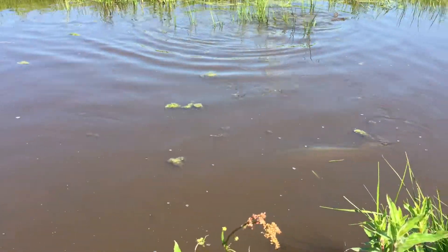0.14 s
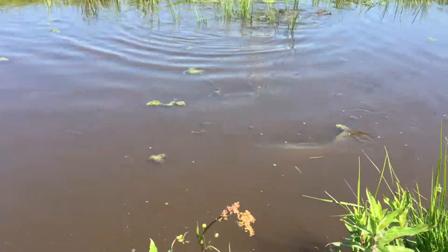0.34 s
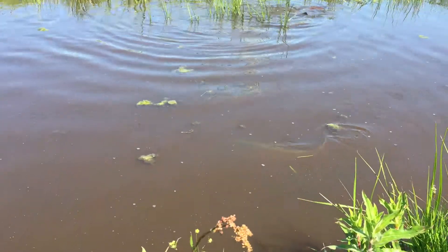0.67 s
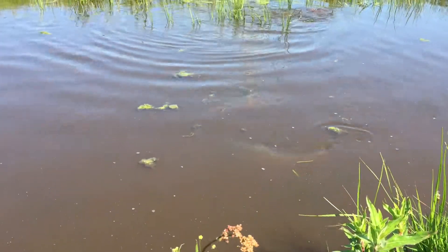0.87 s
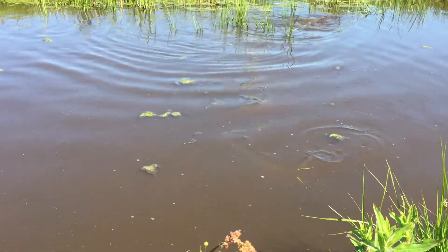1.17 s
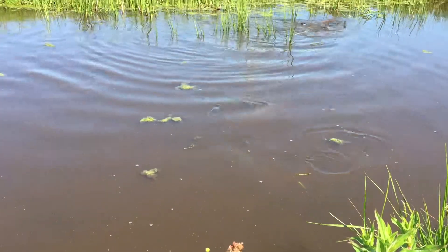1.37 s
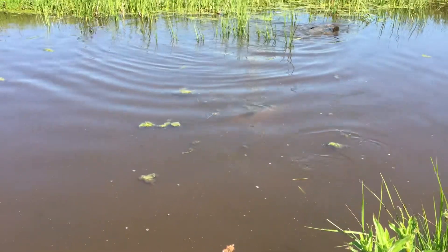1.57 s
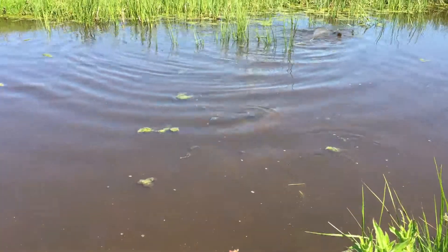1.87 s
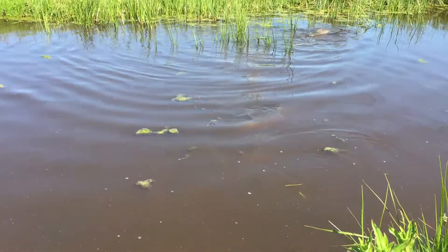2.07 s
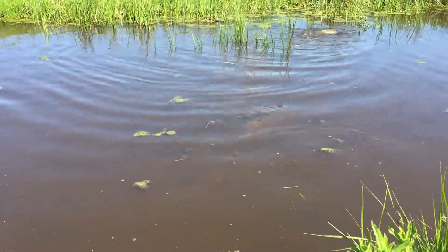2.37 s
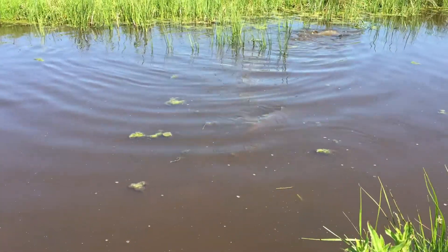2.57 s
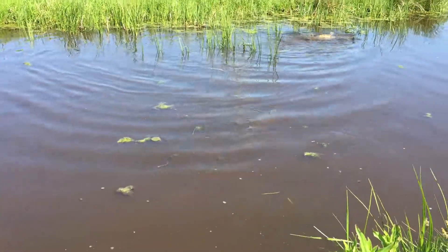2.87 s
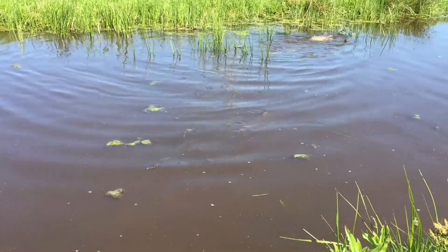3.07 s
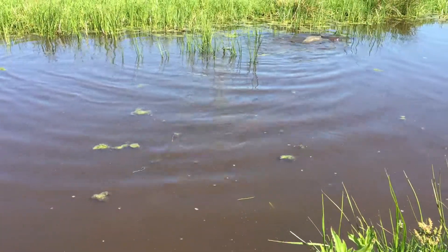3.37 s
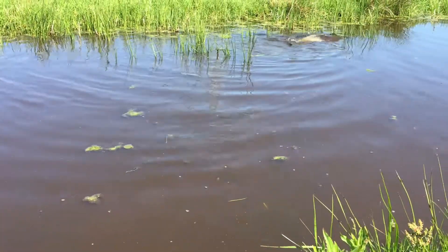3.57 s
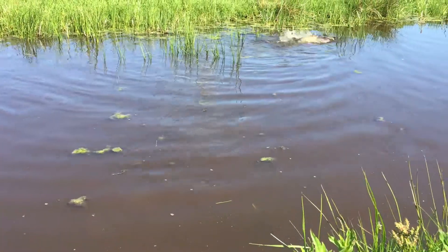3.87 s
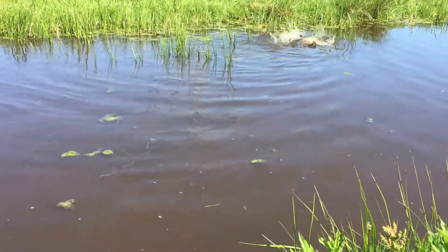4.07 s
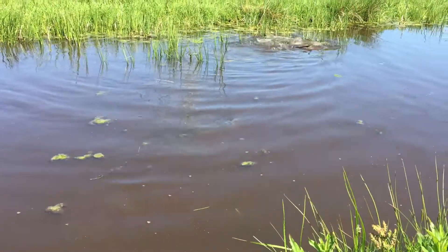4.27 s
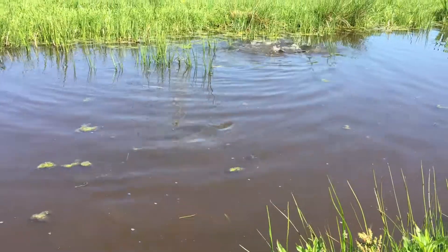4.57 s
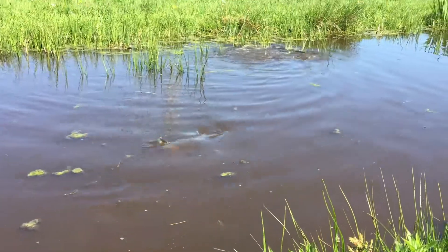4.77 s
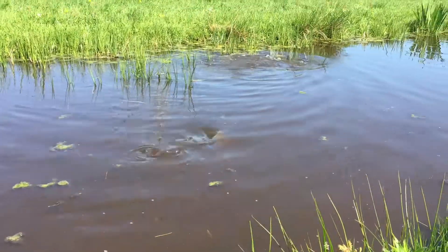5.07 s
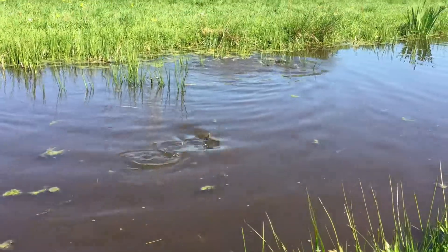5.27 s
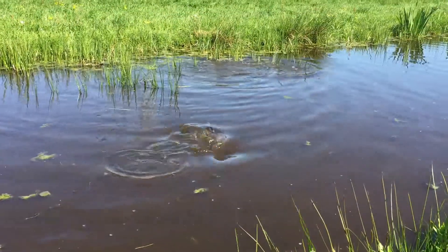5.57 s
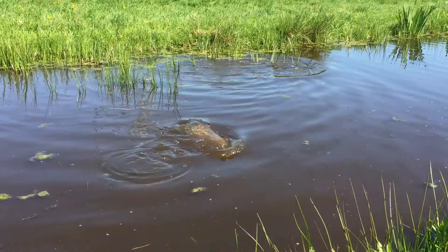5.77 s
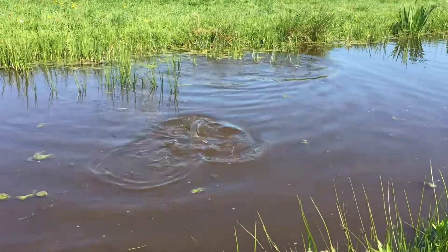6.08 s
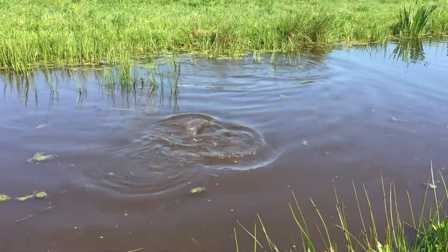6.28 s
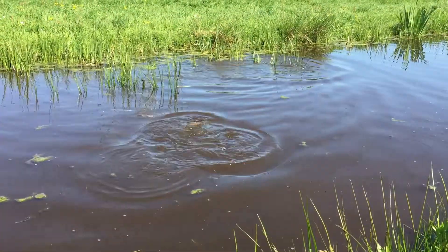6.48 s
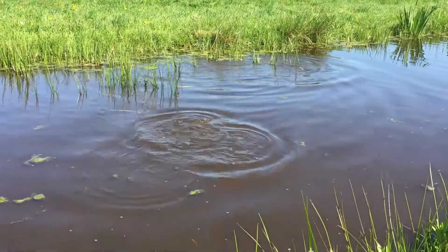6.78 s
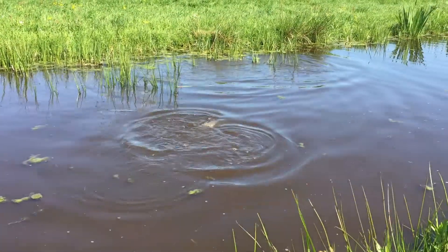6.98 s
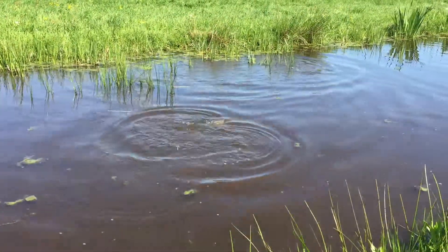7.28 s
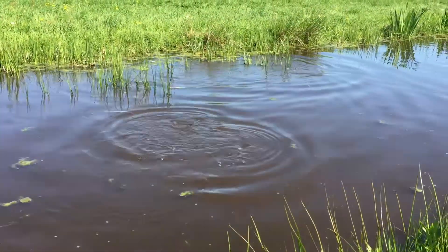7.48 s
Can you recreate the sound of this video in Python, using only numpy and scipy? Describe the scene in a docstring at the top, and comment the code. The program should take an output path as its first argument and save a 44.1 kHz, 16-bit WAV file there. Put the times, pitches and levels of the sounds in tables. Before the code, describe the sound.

A shallow ditch in open grassland, heard in mono from a few metres. Deep, lumpy wind rumble buffets the microphone throughout, over faint airy hiss and a distant low drone, perhaps an aircraft. From 0 to 1 s, fish stir the water with small slaps, rounded plops and tiny ticking drops. It is nearly still until 2.2 s, with only a few soft bubbles around 1.5 s, then light plips and gurgles until 3.5 s. At about 3.6 s the movement builds, and at 3.9-4.2 s comes the loudest splash: sharp wet slaps, hollow bubbles and dense spray, spattering and gurgling away by 5 s. A smaller, uneven roll churns from 5.2 to 5.8 s, strongest near 5.4-5.6 s. Sparse drips tick around 6.1 and 6.4 s. The drone swells slightly after 6.3 s, and very faint gliding whistles, perhaps a bird, appear from 7 s to the end at about 7.6 s.

```python
"""In a shallow grassy ditch, carp roll and thrash at the surface, a few metres from a hand-held microphone.
Trapped air pockets plop as gliding sines; thrown water slaps as bursts of noise and falls back as ticking drops.
Wind rumbles on the microphone as deep noise. A far drone, perhaps an aircraft, is a band of noise with one
slowly sinking tone. A few faint gliding whistles come late, and a steady hiss of open air lies under it all."""
import sys
import numpy as np
from scipy import signal
from scipy.fft import rfft, irfft, next_fast_len
from scipy.io import wavfile
from scipy.ndimage import uniform_filter1d

SR = 44100
rng = np.random.default_rng(int(sys.argv[2]) if len(sys.argv) > 2 else 0)


def persist_wave(psi):
    """Save psi, clipped to +-1, as 16-bit WAV."""
    counts = np.round(np.clip(psi, -1, 1) * 32767).astype(np.int16)
    wavfile.write(sys.argv[1], SR, np.atleast_2d(counts).T)


N = 336997   # length in samples


def from_db(db):
    """Turn decibels into a factor to multiply by."""
    return 10 ** (np.asarray(db) / 20)


def rms_one(x):
    """Scale a signal to an average strength (rms) of 1."""
    return x / np.sqrt(np.mean(x ** 2) + 1e-20)


def in_time(rows):
    """Draw straight lines between the rows of a table, giving each column a value at every sample."""
    seconds, *columns = np.transpose(rows)
    return [np.interp(np.arange(N) / SR, seconds, column) for column in columns]


def at_hz(points, hz):
    """Read a table of pitch and level at any pitch, with octaves evenly spaced."""
    points_hz, points_db = np.transpose(points)
    return np.interp(np.log(hz), np.log(points_hz), points_db)


def noise(spectrum):
    """Noise of the given colour, at rms 1: white noise with each frequency scaled."""
    size = next_fast_len(N)
    hz = np.arange(1, size // 2 + 2) * SR / size
    white = rng.standard_normal(size)
    coloured = irfft(rfft(white) * from_db(at_hz(spectrum, hz)), size)
    return rms_one(coloured[:N])


def drift(hz):
    """Random wandering with spread 1, mostly slower than the given rate."""
    return noise([(hz, 0), (hz * 100, -80)])


def evened(x, span_s, share):
    """Take out part of a signal's own swelling, leaving rms 1."""
    span = int(span_s * SR)
    power = uniform_filter1d(uniform_filter1d(x ** 2, span), span)
    return rms_one(x / (power + 1e-3) ** (share / 2))


def add_ring(out, s, db, hz, rise_oct, length_ms, attack=0.11, swell=0.19, fall=0.9, end=1.29, climb=1.4,
             wobble=None):
    """Add a sine that swells and dies away; an air pocket's pitch can climb as it nears the surface."""
    length, start = max(length_ms, .1) * SR / 1000, int(s * SR)
    u = np.arange(min(int(4 * length) + 3, N - start + 1)) / length   # time, counted in lengths
    octaves = rise_oct * np.minimum(u, climb)
    if wobble is not None:   # moving water bends the pocket and its pitch
        octaves[1:] += wobble[start:start + len(u) - 1]
    pitch = np.minimum(hz * 2 ** octaves, .45 * SR)
    opening = 1 - np.exp(-u / (attack + swell * abs(rise_oct)))   # a far glide opens slowly
    shape = opening * np.exp(-fall * u ** end)
    # a rising pocket bursts after a good octave
    shape = shape * np.exp(-(np.maximum(rise_oct * u, 0) / 1.15) ** 8)
    wave = from_db(db) * shape / shape.max() * np.sin(2 * np.pi * np.cumsum(pitch) / SR)
    out[start:start + len(u) - 1] += wave[1:]


def wind(flutter_db=-49, flutter_follows=0.85, gusty_db=2.5, flutter_ragged_db=3.64, wake_db=-14, wake_s=0.026):
    """Eddies push on the microphone: a deep rumble, a lumpier flutter and single buffets."""
    # How strong the rumble is, before quick gusts. Each row: time in seconds, level in dB.
    rumble_levels = [(0, -67), (.08, -37), (.31, -44), (1.07, -41.5), (1.14, -50), (1.3, -43), (1.79, -40),
                     (1.95, -46), (2.12, -36.5), (2.29, -51), (2.36, -41), (2.47, -48), (2.96, -40.5),
                     (3.53, -42), (3.9, -46.5), (4.15, -36), (4.32, -46.5), (4.63, -42), (5.05, -47.5),
                     (5.2, -39.5), (5.49, -48.5), (5.66, -38), (5.76, -53.5), (5.93, -40), (6.96, -39),
                     (7.28, -48), (7.54, -36.5), (7.64, -52.5)]
    # Colour of the rumble. Each row: frequency in Hz, relative level in dB per Hz.
    rumble_colour = [(20, -26), (32, 3), (48, 15), (65, 17), (95, 13), (125, 8), (160, -55.5)]
    # Colour of the flutter. Each row: frequency in Hz, relative level in dB per Hz.
    flutter_colour = [(70, -1.5), (105, -4), (135, -1), (170, -7.5), (210, -17), (280, -19), (500, -41.5)]
    # Single buffets, before the treble is cut. Each row: start in seconds, peak level in dB, pitch in Hz.
    buffets = [(0.055, -29.5, 92), (0.489, -32, 94), (0.585, -30, 98), (0.858, -32.5, 84), (1.051, -30, 84),
               (1.394, -32, 86.5), (2.094, -33.5, 131), (2.554, -25.5, 69), (2.713, -36, 85.5),
               (2.943, -24, 78.7), (3.097, -27, 76), (3.189, -27, 76), (3.293, -32, 166), (3.998, -38, 101),
               (4.081, -38, 93), (4.143, -22, 89), (4.146, -32.5, 193), (4.446, -39, 98),
               (4.618, -33.5, 81.4), (5.112, -40, 83.6), (5.21, -45, 86.5), (5.306, -26, 90.4),
               (5.644, -25, 115), (5.687, -31.5, 69.5), (6.534, -37.5, 61.5), (6.895, -47, 90),
               (7.418, -36.5, 114)]
    rumble_db, = in_time(rumble_levels)
    t = np.arange(N) / SR
    # the flutter follows most of the rumble's swing
    flutter = from_db(flutter_db + flutter_follows * (rumble_db - rumble_db.mean()))
    out = from_db(rumble_db + gusty_db * drift(13.7)) * evened(noise(rumble_colour), 0.051, 0.99)
    for s, db, hz in buffets:
        add_ring(out, s, db, hz, 0, 1600 / hz, attack=0.058)
        # each buffet comes in a swirl of flutter
        flutter = flutter + from_db(db + wake_db) * np.exp(-((t - s) / wake_s) ** 2)
    lumps = from_db(flutter_ragged_db * drift(18.4))
    out += flutter * lumps * evened(noise(flutter_colour), 0.13, 0.93)
    return signal.sosfilt(signal.butter(3, 600, fs=SR, output="sos"), out)   # eddies carry no treble


def drone(start_hz=645, sag_hz_per_s=3.4, waver_hz=2.0, flicker_db=3.5, slow_swell_db=2.02, quick_swell_db=1.73):
    """A band of far roar and a thin tone that sinks slowly, with a slight waver."""
    # Levels before random swells and flicker. Each row: time in seconds, roar in dB, tone in dB rms.
    drone_levels = [(0, -57, -67), (.33, -54.5, -72.5), (.45, -55.5, -91), (.9, -57, -83.5),
                    (1.6, -58, -80.5), (2.2, -60.5, -85), (2.8, -61.5, -76), (3.5, -61, -84),
                    (4.7, -58, -70.5), (5.2, -66, -80.5), (5.8, -63, -81.5), (6.3, -56, -84),
                    (6.48, -53, -65.5), (6.9, -51, -82), (7.2, -54.5, -64.5), (7.64, -53, -71.5)]
    # Colour of the roar. Each row: frequency in Hz, relative level in dB per Hz.
    roar_colour = [(120, -41), (200, -13), (284, 4), (367, 5.5), (446, -2), (528, -17.5), (634, -18),
                   (659, -23), (746, -18), (950, -48), (1240, -79), (2090, -120)]
    roar_db, tone_db = in_time(drone_levels)
    tone_hz = start_hz - sag_hz_per_s * np.arange(N) / SR + waver_hz * drift(3.3)
    tone = np.sqrt(2) * np.sin(2 * np.pi * np.cumsum(tone_hz) / SR)   # rms 1
    swell_db = slow_swell_db * drift(1.56) + quick_swell_db * drift(7.8)
    roar = from_db(roar_db + swell_db) * noise(roar_colour)
    return roar + from_db(tone_db + flicker_db * drift(7)) * tone


def air(level_db=-74):
    """The hiss of open air: steady coloured noise."""
    # Colour of the hiss. Each row: frequency in Hz, relative level in dB per Hz.
    air_colour = [(400, -41), (550, -26.5), (800, -4), (1200, -6.5), (2000, -12), (4000, -15.5),
                  (7000, -18), (10500, -22.5), (12500, -21.5), (16000, -24.5)]
    return from_db(level_db) * noise(air_colour)


def slaps(ragged_db=5.5, crest_db=11.5, front=0.25):
    """Sheets of water slap down: short ragged bursts of broad noise, sharp at the front."""
    # The slaps. Each row: start in seconds, nominal peak level in dB, fading time in ms.
    slap_list = [(0.038, -53, 2.2), (0.113, -46.5, 6.6), (0.138, -61, 2), (0.184, -56, 3.1),
                 (0.227, -50, 2.8), (0.5774, -58, 4), (0.769, -44.5, 6.8), (0.7767, -50, 6),
                 (0.877, -59, 2), (0.9092, -48, 1.7), (2.409, -66, 3), (2.595, -54, 3), (2.826, -50.5, 5.2),
                 (3.2327, -52, 4.4), (3.684, -43.5, 4.7), (3.79, -41, 3.7), (3.8334, -48, 4),
                 (3.862, -42, 6), (3.92, -36.5, 6.1), (3.9738, -40, 6), (4.016, -41, 12),
                 (4.3484, -40, 1.9), (4.447, -35, 3.4), (4.548, -47.5, 9.7), (4.655, -40.5, 3),
                 (4.6597, -42, 8.4), (4.7414, -51, 4.5), (5.177, -46.5, 6.2), (5.215, -45, 5.4),
                 (5.3068, -46.5, 4.3), (5.4311, -48, 5.9), (5.537, -42, 5.9), (5.5596, -38.5, 3.1),
                 (5.684, -45, 12), (5.742, -48, 9.2), (5.794, -47, 1.9), (5.886, -58.5, 4.3),
                 (6.0818, -58, 2.2), (6.142, -60, 2), (6.3725, -49, 2.5), (6.4898, -49.5, 2.5)]
    envelope = np.zeros(N)
    for s, db, length_ms in slap_list:
        u = np.arange(int(6 * length_ms * SR / 1000) + 2) * 1000 / (SR * max(length_ms, .2))
        start = int(s * SR)
        # the noise peaks stand about crest_db above its rms
        envelope[start:start + len(u)] += from_db(db - crest_db) * (1 - np.exp(-u / front)) * np.exp(-u)
    wet = noise([(400, -51), (800, 5.5), (2500, -1.5), (5000, -0.5), (16000, -18.0)])
    return envelope * from_db(ragged_db * drift(350)) * wet


def clear_bubbles(wobble_oct=0.04, ragged_db=2.5, tick_ms=2.63, tick_knee_hz=4570):
    """Single air pockets ring with a clear pitch, and single drops land with a short tick."""
    # Air pockets, before wobble and flutter. Each row: start in seconds, peak level in dB,
    # starting pitch in Hz, pitch rise in octaves per length, length (scale of the fade) in ms.
    plops = [(0.084, -59.5, 3020, -0.18, 5.8), (0.1278, -63, 1670, -0.084, 8.8),
             (0.1912, -49.5, 905, 0.047, 15.7), (0.205, -62, 560, 0, 20),
             (0.5561, -49.5, 1890, -0.042, 4.1), (0.576, -62.5, 615, -0.065, 39),
             (0.757, -58, 930, 0.46, 8.5), (0.768, -51, 2130, 0.22, 5.5), (0.777, -59, 1405, 0.14, 11.5),
             (0.806, -52.5, 804, 0.022, 15), (0.816, -59, 2340, -0.18, 5.4),
             (0.8775, -54.5, 1540, -0.055, 3.2), (0.911, -56, 1520, -0.066, 9.7),
             (0.947, -54.5, 1074, 0.021, 17), (1.445, -67, 2000, -0.094, 10),
             (1.4643, -62.5, 980, 0.016, 13), (1.571, -58.5, 1060, 0.74, 28), (1.65, -72, 2100, 0, 7.2),
             (1.918, -68.5, 2600, -.1, 8.3), (1.5738, -58.5, 781, -0.018, 21),
             (2.2043, -61, 934, 0.059, 14.5), (2.298, -62, 783, 0.02, 12), (2.355, -65, 1490, -0.034, 15),
             (2.442, -54.5, 1050, -0.14, 16), (2.472, -59.5, 1376, -0.18, 14),
             (2.537, -63, 3000, -0.0058, 6.8), (2.555, -68, 1610, 0.066, 14), (2.72, -52.5, 629, 0.14, 30),
             (2.828, -50.5, 1137, -0.04, 9.3), (2.89, -65, 1480, -0.017, 8), (3.0316, -55, 900, 0.15, 17),
             (3.3497, -51.5, 980, -0.035, 14), (3.383, -62, 1980, 0.28, 6.2),
             (3.6296, -39.5, 1870, -0.19, 1.8), (3.6836, -41.5, 1750, -0.18, 2.8),
             (3.7447, -41.5, 510, 0.34, 14), (3.787, -54.5, 3010, 0.099, 9.6), (3.79, -59, 700, 0.3, 20),
             (3.792, -49.5, 1630, 0.0, 3.8), (3.8349, -43.5, 867, -0.0055, 18),
             (3.902, -35, 1100, -0.33, 3), (3.9093, -28.5, 980, 0.082, 3.7),
             (3.9158, -40, 1000, -0.35, 3.2), (3.9244, -48, 1420, 0.2, 10), (3.97, -35.5, 530, 0.05, 12),
             (4.074, -35, 870, 0.029, 3.3), (4.129, -31, 534, 0.92, 11), (4.174, -43, 710, 0.26, 6.5),
             (4.185, -36.5, 890, -0.19, 4.7), (4.09, -39, 1005, 0.034, 12.6), (4.213, -46, 616, -0.027, 20),
             (4.269, -41.5, 286, -0.053, 14), (4.281, -48, 930, 0.081, 5.8), (4.293, -47, 930, -0.064, 5.5),
             (4.311, -47, 1040, 0.19, 5.3), (4.345, -47, 650, 0.064, 5.7),
             (4.361, -39.5, 1506, -0.066, 3.8), (4.425, -43, 620, -0.09, 6.6),
             (4.41, -42.5, 1000, 0.16, 5.3), (4.437, -47, 770, 0.65, 12), (4.482, -52, 734, 0.059, 9),
             (4.501, -50, 680, -0.011, 12), (4.5601, -46.5, 670, 0.023, 13), (4.562, -43, 383, 0.0066, 11),
             (4.589, -52.5, 1516, 0.48, 11.6), (4.597, -51, 1390, 0.17, 11), (4.675, -61, 1010, 0.6, 7.4),
             (4.689, -57, 1100, 0.078, 5), (4.6938, -56, 763, -0.0029, 18), (4.723, -59, 807, 0.068, 19),
             (4.7677, -46.5, 976, -0.033, 6.3), (4.7926, -52, 624, 0.14, 8), (4.83, -62, 986, 0.054, 19),
             (4.914, -64, 1000, -0.037, 8.1), (4.936, -45, 2020, 0.015, 3.5),
             (4.982, -60.5, 1023, 0.52, 14), (5.0258, -56.5, 894, 0.061, 23), (5.033, -62, 1200, 0.079, 6),
             (5.108, -62.5, 2880, 0.025, 7), (5.142, -58, 1567, -0.095, 23),
             (5.166, -60, 3000, -0.028, 5.3), (5.213, -46, 615, -0.086, 6.2),
             (5.2273, -52.5, 1130, 0.044, 7.6), (5.3045, -50.5, 2280, 0.071, 10),
             (5.318, -55.5, 1360, 0.07, 6.8), (5.37, -46, 1030, 0.61, 10), (5.375, -42.5, 1415, -0.1, 7.8),
             (5.385, -52, 1043, 0.041, 11), (5.4, -43.5, 2120, 0.048, 3.7), (5.4312, -32.5, 1118, -0.14, 5),
             (5.467, -46.5, 512, 0.32, 23.3), (5.504, -59, 600, 0.65, 9.6), (5.511, -60, 1160, 0.039, 15),
             (5.537, -55, 1105, -0.029, 11), (5.556, -60, 1090, 0.062, 28), (5.562, -61, 535, 0.37, 35),
             (5.5915, -52.5, 924, 0.17, 12.4), (5.622, -63, 682, 0.056, 14), (5.6298, -54, 2300, 0.21, 4.7),
             (5.6525, -49, 3830, 0.023, 2.6), (5.664, -54, 1218, 0.087, 9.3),
             (5.685, -54, 646, -0.062, 7.1), (5.7064, -60, 745, 0.6, 16), (5.7369, -53.5, 970, 0.32, 10.5),
             (5.7688, -44.5, 1340, -0.061, 7.7), (6.0792, -67, 4180, 0.024, 4.7),
             (6.143, -67, 964, -0.0027, 19), (6.147, -70, 1800, 0.056, 6), (6.148, -63, 3180, -0.08, 5.4),
             (6.3743, -58, 842, -0.092, 5), (6.414, -57, 3200, -0.04, 4.8), (6.432, -58.5, 1580, 0.039, 6),
             (6.433, -48.5, 3180, -0.038, 3), (6.966, -65, 1720, -0.057, 12)]
    # Drops, before wobble and flutter. Each row: start in seconds, peak level in dB, pitch in Hz.
    drops = [(0.039, -54, 4070), (0.078, -52.5, 7750), (0.0809, -45, 15200), (0.116, -52, 3440),
             (0.1174, -57, 2150), (0.185, -63, 2500), (0.194, -63, 4400), (0.2256, -48, 7500),
             (0.227, -54.5, 4200), (0.25, -63, 7300), (0.386, -52, 13000), (0.391, -61, 1200),
             (0.399, -63, 5000), (0.42, -61, 2140), (0.434, -67, 2010), (0.556, -55.5, 6370),
             (0.578, -58, 2460), (0.629, -52.5, 6000), (0.651, -62, 3530), (0.751, -56, 1490),
             (0.777, -53, 5600), (0.776, -46.5, 6650), (0.779, -51, 2380), (0.886, -61, 3100),
             (0.924, -59, 2470), (1.414, -67, 2900), (2.2924, -56.5, 3680), (2.295, -65, 2700),
             (2.343, -59, 3620), (2.354, -62, 2980), (2.409, -62, 4720), (2.41, -64, 6400),
             (2.4711, -49, 3100), (2.482, -59, 4250), (2.5064, -53, 14300), (2.596, -52, 2260),
             (2.698, -45.5, 9750), (2.714, -65, 2800), (2.7158, -51, 695), (2.8256, -54, 4600),
             (3.0221, -52.5, 3880), (3.2227, -57, 4440), (3.234, -36.5, 860), (3.234, -47, 1165),
             (3.3464, -49.5, 1930), (3.3984, -45, 15100), (3.451, -45.5, 1750), (3.484, -55, 11400),
             (3.4986, -51.5, 12600), (3.635, -53, 3600), (3.665, -54, 1380), (3.684, -38, 623),
             (3.6889, -48, 7500), (3.7166, -47, 15100), (3.818, -34, 2140), (3.819, -44, 3700),
             (3.822, -44, 1160), (3.862, -41, 3100), (3.872, -45, 2520), (3.884, -46, 3030),
             (3.882, -40, 1570), (3.9386, -32, 820), (3.9516, -24, 645), (3.974, -24, 1510),
             (3.975, -26.5, 2500), (3.9805, -30, 2000), (3.9985, -36, 696), (4.0035, -31.5, 666),
             (4.015, -39, 2000), (4.0209, -37, 3770), (4.039, -35, 2500), (4.0407, -36, 4000),
             (4.0541, -27, 2050), (4.0621, -44, 1540), (4.1214, -27, 1125), (4.1734, -38, 625),
             (4.245, -43.5, 8900), (4.289, -38.5, 6370), (4.3482, -41, 1810), (4.3627, -36, 2880),
             (4.3992, -37, 1990), (4.4212, -42.5, 6060), (4.46, -43, 2900), (4.4904, -37.5, 1300),
             (4.5008, -40.5, 1080), (4.5297, -45, 3120), (4.6222, -44.5, 1650), (4.656, -43, 1230),
             (4.657, -43, 1570), (4.662, -47.5, 6900), (4.7042, -50, 6500), (4.726, -50, 2760),
             (4.737, -51, 1870), (4.7386, -52, 3500), (4.752, -44.5, 2050), (4.8134, -48, 9700),
             (4.853, -40.5, 9400), (4.889, -53.5, 4170), (4.894, -46.5, 6500), (4.945, -52, 3800),
             (4.9534, -55, 4130), (4.957, -55, 1880), (4.968, -54, 4000), (5.0225, -51, 590),
             (5.0652, -52, 935), (5.1986, -50, 3600), (5.21, -46, 6400), (5.2182, -46, 3060),
             (5.276, -62, 800), (5.337, -59, 3160), (5.357, -60, 3000), (5.383, -49, 1830),
             (5.391, -54, 5930), (5.433, -43.5, 2230), (5.4405, -49, 1600), (5.475, -55, 5040),
             (5.481, -55, 1800), (5.499, -53, 2440), (5.5354, -44.5, 3460), (5.5448, -43, 2530),
             (5.558, -46, 5570), (5.561, -48, 4400), (5.592, -53.5, 2300), (5.649, -52, 445),
             (5.6854, -47, 9300), (5.696, -54, 2000), (5.759, -55, 2440), (5.885, -56.5, 1820),
             (6.0824, -52.5, 6660), (6.089, -60, 5440), (6.091, -65, 4270), (6.1, -55, 9000),
             (6.112, -61, 6300), (6.117, -66, 4100), (6.12, -59, 5640), (6.138, -60, 6500),
             (6.139, -60, 12000), (6.38, -66, 7000), (6.498, -62, 2370), (6.502, -45, 14500),
             (6.529, -63, 3570), (6.571, -67, 3300)]
    out, wobble = np.zeros(N), wobble_oct * drift(92)
    for row in plops:
        add_ring(out, *row, climb=3.0, wobble=wobble)
    for s, db, hz in drops:
        length_ms = tick_ms / (1 + (hz / tick_knee_hz) ** 2)   # small, high drops tick ever shorter
        add_ring(out, s, db, hz, 0, length_ms, attack=0.093, wobble=wobble)
    return out * from_db(ragged_db * drift(120))   # the broken surface makes them flutter


def churn(still_db=-107):
    """How hard the water is stirred, as gurgle and spray levels: peaks over calm, or a splash's own curve."""
    # Small stirs of fin or tail. Each row: time of the peak in seconds, gurgle in dB, spray in dB.
    stirs = [(.12, -78, -74.5), (.22, -67, -83), (.42, -74.5, -77.5), (.58, -70, -75), (.78, -86, -71),
             (.93, -72.5, -90), (2.35, -75, -79), (2.471, -65.5, -75), (2.597, -68.5, -94),
             (2.83, -68.5, -78), (3.05, -71.5, -95), (3.35, -66.5, -75.5), (3.49, -93, -76.5)]
    # The big splash, then the second roll, one list each.
    # Each row: time in seconds, gurgle in dB, spray in dB.
    splashes = [
        [(3.57, -88, -106), (3.63, -60.5, -74), (3.76, -69.5, -69), (3.88, -48, -70), (3.93, -41, -55.5),
         (4.04, -42, -50), (4.21, -45, -56), (4.28, -49.5, -53), (4.34, -48.5, -58.5), (4.385, -53, -61),
         (4.43, -50.5, -60), (4.5, -50.5, -55), (4.53, -60.5, -62.5), (4.56, -46.5, -60.5), (4.6, -69, -69.5),
         (4.67, -58.5, -63.5), (4.75, -60, -67.5), (4.8, -63.5, -76), (4.88, -75.5, -73), (4.95, -72.5, -64.5),
         (5.06, -75, -78.5)],
        [(5.06, -82, -100), (5.16, -67.5, -75), (5.21, -69, -59), (5.28, -65.5, -76), (5.35, -76, -70),
         (5.39, -65.5, -68), (5.5, -59, -70.5), (5.55, -70, -59.5), (5.62, -59, -75), (5.69, -61.5, -63),
         (5.77, -71, -74.5), (5.82, -72, -89), (6.04, -74, -80)],
    ]
    t, level_db = np.arange(N) / SR, np.full((2, N), float(still_db))
    rise, fall = np.array([[123], [182]]), np.array([[113], [150]])   # dB per second: gurgle, spray
    for s, *peak_db in stirs:
        stir_db = np.transpose([peak_db]) - np.maximum(rise * (s - t), fall * (t - s))
        level_db = np.maximum(level_db, stir_db)   # the stronger stir rules
    for rows in splashes:
        during = (t > rows[0][0]) & (t <= rows[-1][0])
        level_db = np.where(during, in_time(rows), level_db)
    return level_db


def busy(level_db, calm=0.14, full_db=-45, slope=.5):
    """Share of the full rate of pockets and drops: the harder the stir, the denser."""
    return np.clip(from_db(slope * (level_db - full_db)), calm, 1)


def spray(level_db, per_s=18000, spread_db=4.0, cycles=17.0, clump_db=2.2, patch_db=3.2):
    """Fine drops land in clumps; each ticks for a few cycles at a pitch set by its size."""
    # Colour of the spray, before a tilt to the treble. Each row: pitch in Hz, relative level in dB.
    spray_colour = [(1500, -21.5), (2200, -7.5), (3400, -16), (4200, -13.5), (5000, -20), (7000, -19.5),
                    (12500, -29.5), (16000, -31)]
    share = busy(level_db, full_db=-52.0)
    loudness = from_db(spread_db * np.minimum(rng.exponential(1, N), 5))
    hits = loudness * rng.choice([-1, 1], N) / np.sqrt(share)
    lands = rng.random(N) < per_s * share * from_db(clump_db * drift(30)) / SR
    patches = [from_db(patch_db * drift(22.0)) for _ in range(4)]   # drops of like size come together
    pitches = np.geomspace(1800, 15000, 24)
    dealt = (24 * np.sqrt(rng.random(N))).astype(int)   # most are small
    out = 0
    for k, hz in enumerate(pitches):
        r, w = from_db(-60 * hz / (cycles * SR)), 2 * np.pi * hz / SR
        ring = [1, 0, -1, 1, -2 * r * np.cos(w), r * r]   # applied twice: a soft landing
        tick = signal.sosfilt([ring, ring], hits * lands * (dealt == k) + 1e-18)
        strength = from_db(at_hz(spray_colour, hz)) * np.sqrt(hz)
        out = out + strength * patches[k // 6] * rms_one(tick)
    return from_db(level_db) * evened(out, 0.1, 0.16)


def gurgle(level_db, share_db=-2.3, count=12000, cycles=6.8, spread_db=3.5, rise_oct=0.194):
    """Many small pockets within the churn, at random moments and sizes, over more than four octaves."""
    # Colour of the gurgle, before random loudness. Each row: pitch in Hz, relative level in dB.
    gurgle_colour = [(210, -5), (400, -20), (630, -4.5), (1000, 3), (1500, 0.5), (2100, 3), (3000, -10.5),
                     (5000, -2.5)]
    out, draws, share = np.zeros(N), rng.random((count, 6)), busy(level_db)
    for when, size, loud, climb, ring, lot in draws:
        if lot < share[int(when * (N - 1))]:   # calm water lets fewer through
            hz = 210 * 2 ** (4.4 * size ** 0.802)
            db = at_hz(gurgle_colour, hz) - spread_db * np.log(loud + 0.01)
            length_ms = cycles * (0.18 + ring) * 1000 / hz
            add_ring(out, when * (N - 1) / SR, db, hz, rise_oct * 2 * climb ** 2, length_ms)
    return from_db(share_db) * from_db(level_db) * evened(out / np.sqrt(share), 0.041, 0.18)


def wash(level_db, pivot_db=-43.5, below_db=-10.5, follows=1.15, ragged_db=5.0):
    """Churning water too dense for single pockets: a ragged rush that grows with the stir."""
    # Colour of the rush. Each row: frequency in Hz, relative level in dB per Hz.
    wash_colour = [(150, -19), (300, -3), (600, 1), (1000, -8.5), (1600, 2), (2500, -1), (4200, -8),
                   (6000, -16), (12000, -22)]
    rush_db = pivot_db + below_db + follows * (level_db - pivot_db)
    return from_db(rush_db + ragged_db * drift(78)) * noise(wash_colour)


def banks(x, echoes=((.0043, -12), (.011, -16), (.023, -20)), dull_hz=3500):
    """A few dull echoes from the water and the grassy banks, given as delay in seconds and level in dB."""
    dull = signal.sosfilt(signal.butter(1, dull_hz, fs=SR, output="sos"), x)
    out = x.copy()
    for s, db in echoes:
        delay = int(s * SR)
        out[delay:] += from_db(db) * dull[:N - delay]
    return out


def chirps(wobble_oct=0.054, ragged_db=4.0):
    """Thin gliding whistles far off, perhaps a small bird: sines that are barely over the hiss."""
    # The whistles, before wobble and flutter. Each row: start in seconds, peak level in dB,
    # starting pitch in Hz, pitch rise in octaves per length, length (scale of the fade) in ms.
    chirp_list = [(6.957, -74, 3500, -.05, 9.8), (7.215, -77, 3900, 0, 16), (7.225, -76, 4420, -0.12, 19),
                  (7.361, -77, 4200, -0.27, 10), (7.389, -75, 3960, -0.16, 10), (7.48, -73, 3770, 0.27, 10),
                  (7.538, -74, 4900, -.12, 13)]
    out, wobble = np.zeros(N), wobble_oct * drift(120)
    for row in chirp_list:
        add_ring(out, *row, attack=0.3, end=2.0, climb=2.2, wobble=wobble)
    return out * from_db(ragged_db * drift(150))


def scene():
    """Mix wind, drone and air with the water and its echoes, and the late chirps."""
    gurgle_db, spray_db = churn()
    water = slaps() + clear_bubbles() + spray(spray_db) + gurgle(gurgle_db) + wash(gurgle_db)
    mix = wind() + drone() + air() + banks(water) + chirps()
    return mix[None]   # one channel


def record(dry):
    """The microphone loses the deepest bass; the top is cut."""
    thin = signal.sosfilt(signal.butter(5, 38, "high", fs=SR, output="sos"), dry)
    # at least 60 dB down from 16150 Hz upward
    return signal.sosfilt(signal.cheby2(16, 60, 16150, fs=SR, output="sos"), thin)


dry = scene()
out = record(dry)
persist_wave(out)
```